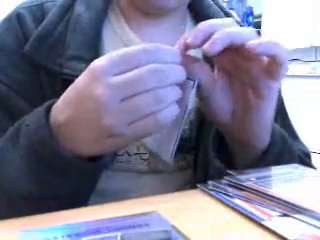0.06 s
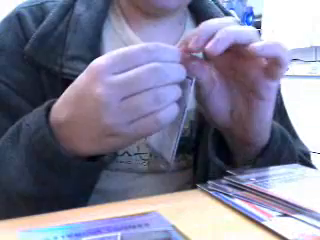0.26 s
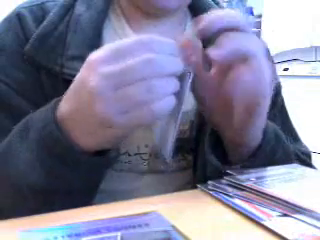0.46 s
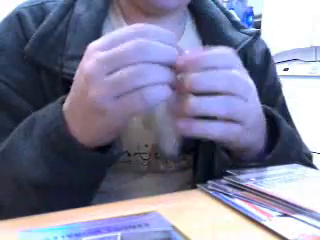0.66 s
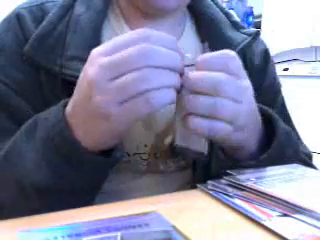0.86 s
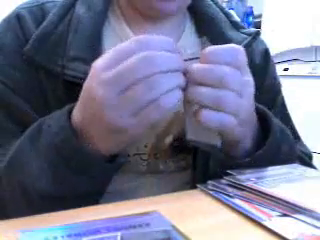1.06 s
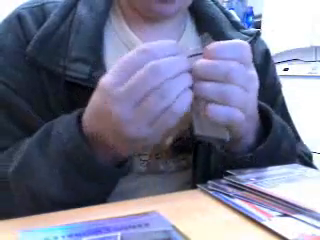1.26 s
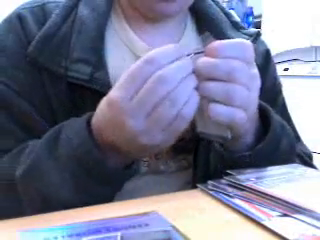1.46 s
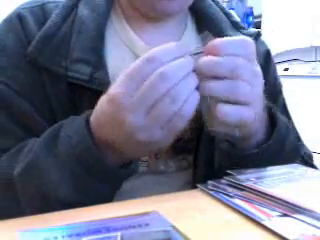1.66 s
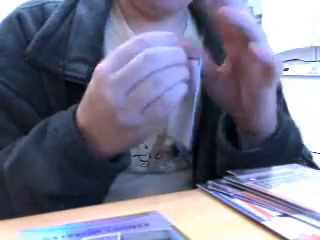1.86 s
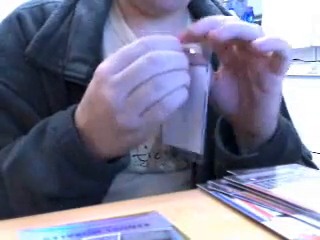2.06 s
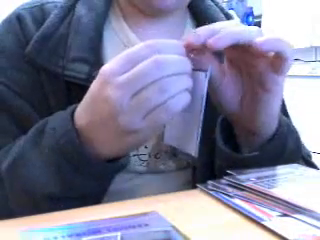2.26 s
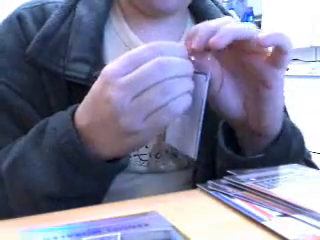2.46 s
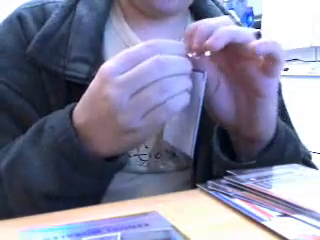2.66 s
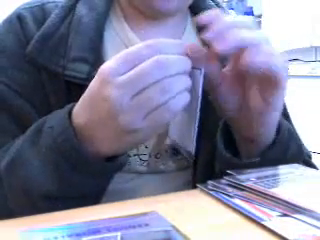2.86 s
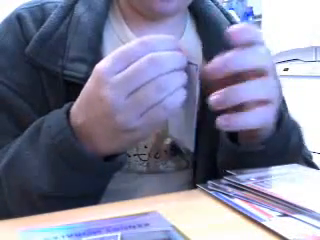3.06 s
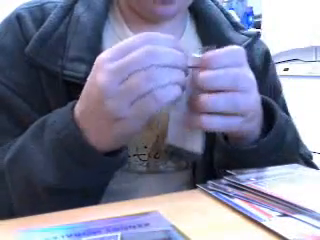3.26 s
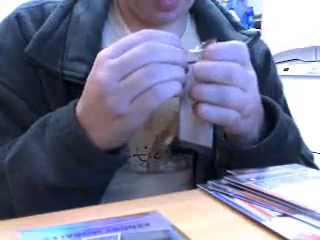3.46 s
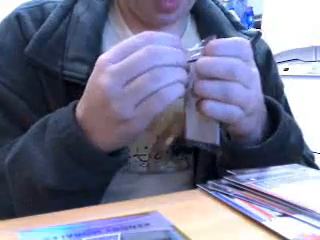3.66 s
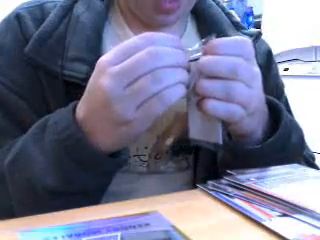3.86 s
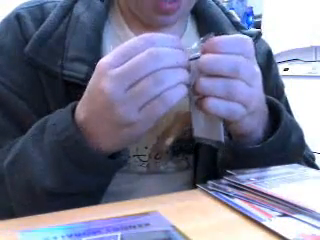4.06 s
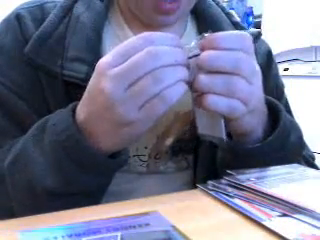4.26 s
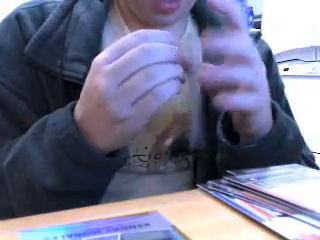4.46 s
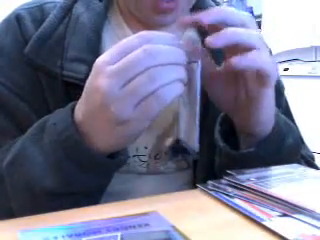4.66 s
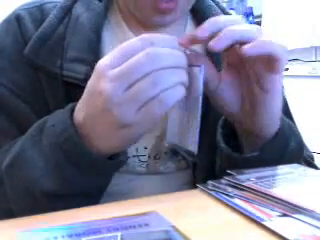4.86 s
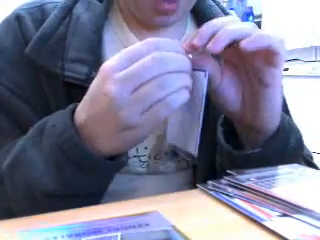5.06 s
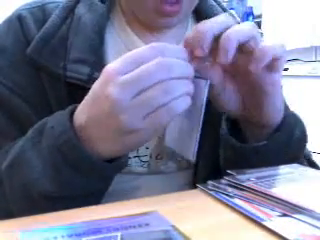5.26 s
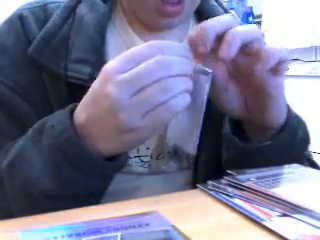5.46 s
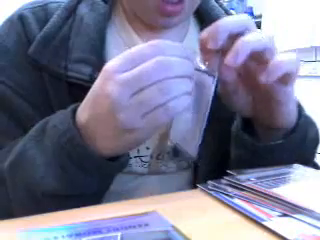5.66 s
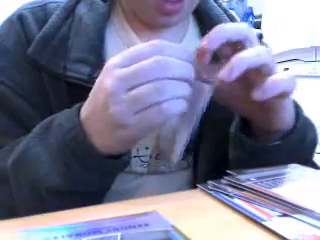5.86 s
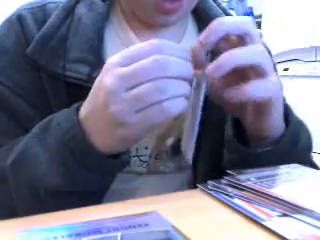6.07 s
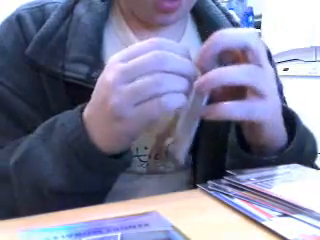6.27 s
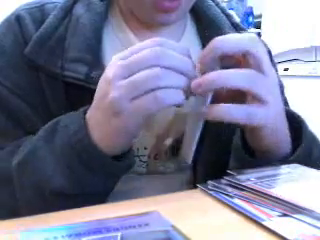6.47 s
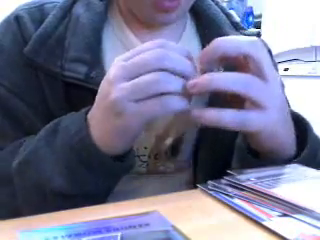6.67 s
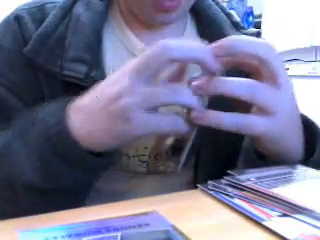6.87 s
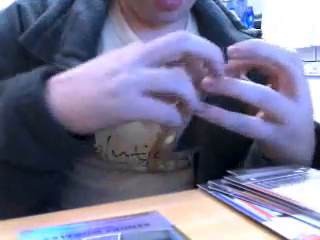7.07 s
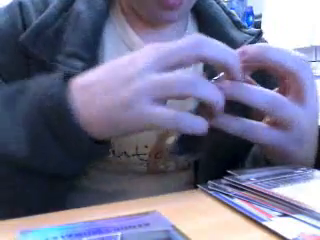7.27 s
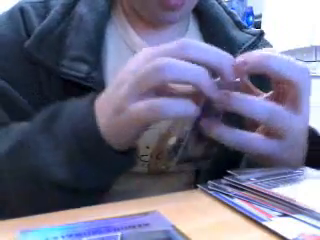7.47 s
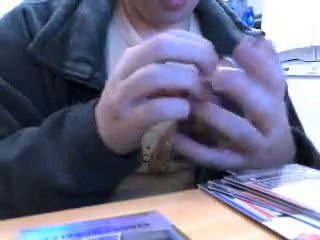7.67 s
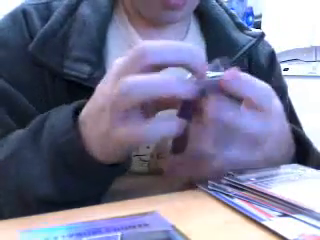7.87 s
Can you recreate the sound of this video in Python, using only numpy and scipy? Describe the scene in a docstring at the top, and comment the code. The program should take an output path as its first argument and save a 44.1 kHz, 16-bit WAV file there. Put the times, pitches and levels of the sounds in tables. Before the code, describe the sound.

Hands crease and tear a stiff plastic wrapper at a table, close to the microphone. Irregular dry snaps, crisp and ringing, with finer crinkle between them, come in waves: strong early, nearly quiet for a while, scattered in the middle, then thick and loud towards the end. Occasional dull finger knocks and soft low thumps join in. Small room, short reflections, faint hum and hiss.

```python
"""Small plastic pack torn by hand

In a quiet room, close to the microphone, fingers tear a small plastic pack. Each crease of the film is a noisy
rattle ringing resonances: sharp snaps, with finer crackle between them. Knocks ring the body of the pack alone,
and decaying sine swings make the low thumps of the moving pack pushing at the microphone. A near wall and
the room answer; mains hum and shaped-noise hiss lie underneath, and the loudest snaps clip."""
import sys
import numpy as np
from scipy import signal
from scipy.fft import rfft, irfft, next_fast_len
from scipy.io import wavfile
from scipy.ndimage import map_coordinates

SR = 44100
rng = np.random.default_rng(int(sys.argv[2]) if len(sys.argv) > 2 else 0)


def transcribe(u):
    """Save the signal u as a 16-bit wav file named by the first command-line argument.

    u: samples, shape (n,) or (channels, n), limited to [-1, 1]; the rate is SR.
    q: integer samples, one column per channel.
    """
    v = np.clip(np.atleast_2d(u).T, -1, 1)
    q = np.round(v * 32767).astype(np.int16)
    wavfile.write(sys.argv[1], SR, q)


N = 349272  # length of the scene in samples


def amp(db):
    """Amplitude factor of a level in dB."""
    return 10 ** (np.asarray(db) / 20)


def unit(x):
    """x scaled to an RMS of 1."""
    return x / np.sqrt(np.mean(x ** 2) + 1e-20)


def along(points, hz):
    """Values at hz, read between (Hz, value) points on a log frequency axis."""
    point_hz, value = np.transpose(points)
    return np.interp(np.log(hz + 1), np.log(point_hz), value)


def wobble(rate):
    """A smooth random curve through rate knots a second."""
    knots = rng.standard_normal(int(N * rate / SR) + 4)
    return map_coordinates(knots, [np.arange(N) * rate / SR])


def filtered(x, response):
    """x passed through a response given as a function of frequency in Hz."""
    size = next_fast_len(N + SR // 2)
    spectrum = rfft(x, size) * response(np.fft.rfftfreq(size, 1 / SR))
    return irfft(spectrum, size)[..., :N]


# Spectrum of the hiss in the empty room. Each row: frequency in Hz, relative density in dB per Hz.
HISS_SPECTRUM = [(25, -5), (50, -5), (107, -8), (200, -12.5), (480, -17), (850, -23.5), (1500, -22.5),
                 (2700, -27), (6000, -29.5), (9000, -33), (12500, -36)]


def floor():
    """Mains hum, drifting slightly in phase and level, over noise shaped into rumble and hiss."""
    t = np.arange(N) / SR
    hum = np.sin(2 * np.pi * 59.7 * t + .4 * wobble(4)) * amp(wobble(8))
    hiss = unit(filtered(rng.standard_normal(N), lambda hz: amp(along(HISS_SPECTRUM, hz))))
    return amp(-47.0) * hum + amp(-50.5) * hiss


def ringing(f, modes):
    """The complex response of a set of resonances, summed with alternating sign."""
    total = 0
    for k, (center, width, db) in enumerate(modes):
        resonance = 1j * f * width / (center * center - f * f + 1j * f * width)
        total = total + (-1) ** k * amp(db) * resonance
    return total


def buckle(times, db, modes, rise, t60, spread):
    """A short rattle of force at each time rings the modes, their pitch shifted at random each time.

    rise and t60 are in seconds, db is the energy of each event, spread the pitch scatter as a log ratio."""
    t = np.arange(-150, 618) / SR
    swell = np.exp(t / rise) + 0.13 * np.exp(t / (4 * rise))  # a faint slower swell leads into the sharp peak
    decay = amp(-60 * t / t60) + 0.39 * amp(-60 * t / (4 * t60))
    shape = np.where(t < 0, swell, decay)
    chance = rng.standard_normal((len(times), len(t) + 1))
    force = chance[:, 1:] * shape
    hz = np.fft.rfftfreq(len(t), 1 / SR) * np.exp(spread * chance[:, :1])
    low_cut = hz / (hz + modes[0][0])  # thins out what lies below the first mode
    rows = irfft(rfft(force) * ringing(hz, modes) * low_cut, len(t))
    rows = rows / np.linalg.norm(rows, axis=1, keepdims=True) * amp(db)[:, None]
    where = np.round((times[:, None] + t) * SR).astype(int)
    return np.bincount(np.clip(where, 0, N).ravel(), rows.ravel(), N + 1)[:N]


# Resonances of the bright edge, the sheet and the pack's body.
# Each row: frequency in Hz, width in Hz, level within its own set in dB.
EDGE_MODES = [(5566, 656, 4.5), (7450, 870, 3.5), (8830, 2180, 4.5), (11200, 3900, -2.5)]
SHEET_MODES = [(2495, 290, -2), (2937, 630, 9), (4380, 2440, -10)]
BODY_MODES = [(520, 570, -5.5), (1160, 310, 2), (1885, 500, 2.5)]
# the duller a crease, the more the body joins: dB against the edge, growth per dB of sheet ring, spread dB
BODY_DB, BODY_GROWS, BODY_SCATTER_DB = -15.5, 0.68, 3


def film(times, db, sheet_db, t60):
    """A buckling crease drives the bright edge, the sheet and the pack's body."""
    body_db = BODY_DB + BODY_GROWS * sheet_db + BODY_SCATTER_DB * rng.standard_normal(len(times))
    edge = buckle(times, db, EDGE_MODES, 0.00029, t60, spread=0.072)
    sheet = buckle(times, db + sheet_db, SHEET_MODES, 0.00042, 0.88 * t60, spread=0.063)
    body = buckle(times, db + body_db, BODY_MODES, 0.00048, 2.84 * t60, spread=0.1)
    return edge + sheet + body


# Single snaps of the film, loud and faint, close to the microphone.
# Each row: time in seconds, energy of the bright edge in dB, sheet ring in dB against the edge.
SINGLE_SNAPS = [(0.0493, -5, -10.5), (0.0607, -10, -23), (0.0956, -8.0, -17), (0.1021, -3.5, -13),
                (0.1395, -7.5, -0.5), (0.2294, -7.5, -13), (0.3269, -7.5, -21), (0.3718, -3, -9.5),
                (0.4583, -2.5, -8), (0.5622, -0.5, -4.5), (0.5663, -9, -1), (0.6173, -9.5, -21),
                (0.6265, -13, -10), (0.7369, 1, -13.5), (0.746, 4, -16), (0.7528, -6, -6),
                (0.7575, -1, -16), (0.7772, 0, -11), (0.7834, 4, -16), (0.793, 5.5, -22), (0.7975, 0, -9),
                (0.8105, 2, -8), (0.8177, 1.5, -13), (0.843, -2, -11), (0.8476, 9.0, -10.5),
                (0.854, 2.5, -7), (0.9015, -6, 2), (0.9093, -8, 7.5), (0.9244, 9.5, -23), (0.9288, -5, 8),
                (0.9348, 5.5, -9), (0.9589, -5.0, 5.5), (0.9727, 9.5, -9), (0.9774, 10.5, -15),
                (0.9823, -8, 11), (1.0047, -7, 4), (1.0115, 3.5, 0), (1.0233, 8.5, -5), (1.041, -1.5, -2.5),
                (1.0712, 1.5, -8), (1.123, 0, -10), (1.128, 3.5, -9), (1.1777, 2, 2.5), (1.2062, 0, -2.5),
                (1.2519, -2, 5.5), (1.2886, -14, -9), (1.3061, 9.5, -6), (1.3275, 4.5, 5.5), (1.342, 3, -7),
                (1.3759, 8.5, -8), (1.4304, 11.5, -1.5), (1.441, 11.5, -1.5), (1.5284, -18, 4.5),
                (1.5559, -2, -7), (1.6233, 7.5, -3.5), (1.6717, -10.5, -6), (1.731, -3, -1),
                (1.736, 14.5, -6.5), (1.7442, 6, -11), (1.7491, 2.5, -6), (1.768, 6.5, -5),
                (1.7874, 12.5, -2), (1.8362, 0, 1), (1.8384, 10, -9), (1.85, 1.0, -22), (1.8645, 13, -10.5),
                (1.8888, 0.5, -13), (1.9017, -5.5, 3), (1.9402, -10, -5), (1.9912, -10.0, -2),
                (2.0253, 5.5, -4), (2.045, 10, -4), (2.084, -10, -7), (2.0997, -4.5, -6), (2.1158, -8, -1),
                (2.2166, -10.5, -19), (2.2586, -21.5, 7), (2.2936, -13.5, -11), (2.3071, -15.5, 3.5),
                (2.3231, -6.5, -3), (2.4437, -5.5, -5.5), (2.4518, -7.5, -25), (2.473, -8.5, -13),
                (2.4794, -6, -8.5), (2.5623, -11, -21), (2.5787, -6.5, -9), (2.687, -0.5, -15),
                (2.7046, -3, -10), (2.729, -14, -5), (2.8262, -8, -7.5), (2.8483, -12, -11),
                (2.8981, -7, -11), (2.9137, -11.5, -9), (2.936, -5.0, -5.5), (3.08, -24, -3),
                (3.117, -6, -12.5), (3.1456, -11.5, -18), (3.1844, -17.5, -2), (3.2009, -19.5, 2),
                (3.2511, -10, -7), (3.2657, -8, 3.5), (3.2886, -10.5, -1), (3.2989, -2, 0),
                (3.307, -8.5, 2), (3.3116, -4, -4), (3.3326, 3, -4.5), (3.3533, -1, -4),
                (3.3766, 5.5, -4.5), (3.3846, 2.5, 0), (3.3897, 0, -4), (3.4121, -10, -3),
                (3.4343, 8.0, -12), (3.4472, -6, -5), (3.4498, 5.5, -13), (3.469, -6.5, -6),
                (3.524, -12, -5), (3.533, -9.5, 4.5), (3.5407, -20.5, 12), (3.5823, 2.5, -19),
                (3.5985, -3.5, 3), (3.614, -3.5, -6.5), (3.6959, -34, 22), (3.73, -14, -10),
                (3.7429, 6.0, -4), (3.7735, 4, -0.5), (3.7773, 0.5, -10), (3.7842, -6.0, 3),
                (3.7953, -8, -13), (4.0119, -12.0, -7), (4.1806, 4, 0.5), (4.272, -21, 10.5),
                (4.3886, 1.5, -5.5), (4.4457, -2.5, 1.5), (4.4567, 0, -3), (4.469, -11, 0),
                (4.4719, -5, 2.5), (4.5302, -7, -5), (4.5425, -2.5, -10), (4.5563, -1, -6),
                (4.6199, -0.5, -7), (4.6382, 0, -10), (4.6435, 4, -11), (4.7005, -18.5, -5),
                (4.7965, 2.5, -8.5), (4.829, -11, 1), (4.848, -12.5, 0), (4.8855, 3.5, -5.5),
                (4.9066, -3.0, 0), (4.9504, -14, 1.5), (4.9806, 2.5, 0), (5.0433, -5, -2.5),
                (5.055, -3, -28), (5.1231, -5, -4), (5.182, -8, -10), (5.2364, 1.5, -33),
                (5.249, -3.5, -3.5), (5.2872, -9, -15), (5.2978, -12, -20), (5.3227, 5, -18),
                (5.386, 2.5, -3), (5.4228, -11, -7), (5.443, -7.5, -1.5), (5.4749, 1, -5), (5.4839, 2, -20),
                (5.4883, -3, 1), (5.4953, 13, -15), (5.504, -1, 4), (5.5082, 9.5, -12), (5.5212, 5.5, -4),
                (5.5343, 6.5, -4), (5.5424, 10, -17), (5.5521, 0.0, -9), (5.5737, 8, -15),
                (5.5782, 5.5, -8.5), (5.585, 1, -5), (5.6016, 1, -8), (5.6224, 8, -16), (5.6261, 14, -15.5),
                (5.6497, -1.5, -5), (5.685, -4, 2), (5.701, 7.5, -15), (5.7663, -13, -13), (5.8407, -22, 2),
                (5.9044, -0.5, -6.5), (5.9195, 1, -11), (5.9239, 10, -5.5), (5.933, -3, -11),
                (5.9541, 2.5, -9), (5.9922, -8, -11), (6.0232, -10, -6), (6.0344, -11, -3),
                (6.1287, -6, -7), (6.1966, 2, -6), (6.2238, -17, 14), (6.2375, 6, 3.5), (6.267, -4.5, -7),
                (6.28, -12, 9), (6.3093, 5.5, -10), (6.3267, -4.5, -3), (6.3368, -4, 3.5),
                (6.3579, -4, -6.5), (6.4023, 9, -9), (6.4828, -0.5, -9.5), (6.5145, -1.5, -13),
                (6.5192, -3, 0.5), (6.5294, -4, -2), (6.5868, -2, -1), (6.5969, -10.5, -5),
                (6.631, -15.5, -8), (6.6927, -11.5, -10), (6.7342, 5.5, -10), (6.7428, 8.5, -13),
                (6.7757, 2, 1.5), (6.781, -2, -18), (6.7836, 7, 7.5), (6.809, -8.0, 10), (6.8171, -0.5, -8),
                (6.8538, -1, -10), (6.8683, -1, 1.5), (6.8924, 1.5, -3), (6.9191, 0.5, -12),
                (6.9267, 7, -10), (6.9987, 2, -4), (7.0073, 5.5, -6), (7.0299, 2.5, 5.5),
                (7.0349, 3.5, -10), (7.0409, 7.5, -8), (7.0455, 2.5, -4), (7.0528, 3, 1.5),
                (7.0717, 3.5, -10), (7.0853, 3.5, -4), (7.0916, 8.5, -3.5), (7.0967, 5.5, -9),
                (7.1165, -3.0, -4), (7.1208, 3, -5), (7.126, -3, -3), (7.1662, 3.5, -5), (7.1747, 1, -11),
                (7.1817, 13, -7.5), (7.1985, 6.5, -9), (7.2013, 5, -9), (7.2232, 8, -8),
                (7.226, 12.5, -9.5), (7.2303, -0.5, 5), (7.2687, -5.5, 3), (7.3021, -6, -4),
                (7.3088, 0, 1.5), (7.3481, -1.0, -7), (7.3595, -5, -14), (7.4733, -7.0, 0.5),
                (7.5295, 5, -5.5), (7.546, 9, -9.5), (7.5499, 2.5, 0.5), (7.5596, -2, -13),
                (7.5687, 0.5, -2), (7.5937, -1, -3), (7.6034, 10.5, -16), (7.6169, 9, -8.5),
                (7.621, 0.5, -2), (7.6232, 1, -9), (7.6807, -1.5, -18), (7.6935, -13, -13),
                (7.7336, -2.5, -2), (7.7683, -11.5, 1), (7.795, -0.5, -7), (7.8032, 2, -3)]


def snaps():
    """The single creases that can be told apart, each buckling once."""
    return film(*np.transpose(SINGLE_SNAPS), t60=0.0034)


# Stretches where fingers slide over the film.
# Each row: start in seconds, length in seconds, usual crease energy in dB.
SLIDING_STRETCHES = [(0.258, 0.13, -31.5), (0.546, 0.062, -32), (0.688, 0.057, -29), (0.797, 0.05, -19),
                     (0.88, 0.16, -21.5), (1.466, 0.058, -29), (1.752, 0.021, -19), (2, 0.06, -22.5),
                     (2.125, 0.14, -34.0), (2.498, 0.1, -37), (2.683, 0.042, -30), (4.425, 0.086, -27.5),
                     (5.853, 0.061, -32), (6.03, 0.084, -30), (6.201, 0.059, -24.5), (6.405, 0.07, -30),
                     (6.661, 0.053, -38.0), (6.793, 0.09, -18.5), (6.965, 0.17, -21.5), (7.376, 0.087, -33),
                     (7.551, 0.063, -15), (7.702, 0.07, -26), (7.89, 0.04, -29.5)]
SLIDING_FADE_DB_PER_S = 508  # on either side of a stretch
# fine crackle: level under the snaps around it, its build-up before a snap and fade after one
RUSTLE_DB, RISE_DB_PER_S, SETTLE_DB_PER_S = -27, 350, 273


def crackle(count=6000):
    """Fine creases at random moments, strong under sliding fingers and where strong snaps stand close on both sides."""
    chance = rng.random((count, 3))
    s = chance[:, 0] * N / SR
    snap_s, snap_db, _ = np.transpose(SINGLE_SNAPS)
    since = s[:, None] - snap_s
    past_db = np.where(since > 0, snap_db - SETTLE_DB_PER_S * since, -45).max(axis=1)
    coming_db = np.where(since < 0, snap_db + RISE_DB_PER_S * since, -45).max(axis=1)
    between_db = (past_db + coming_db) / 2 + RUSTLE_DB

    start, length, usual_db = np.transpose(SLIDING_STRETCHES)
    outside = np.maximum(np.abs(s[:, None] - start - length / 2) - length / 2, 0)  # seconds from the stretch
    sliding_db = np.max(usual_db - SLIDING_FADE_DB_PER_S * outside, axis=1)

    clump_db = 3 * wobble(25)[(s * SR).astype(int)]
    size_db = -4.5 * (np.log(1 - .98 * chance[:, 1]) + 1)  # many small creases, few large
    db = np.maximum(between_db, sliding_db) + clump_db + size_db
    sheet_db = -11 + 14 * chance[:, 2]
    return film(s, db, sheet_db, t60=0.0034)


# Decay of the room around the pack. Each row: frequency in Hz, time to fall by 60 dB in seconds.
ROOM_DECAY = [(500, 0.61), (3000, 0.11), (7000, 0.16), (12000, 0.047)]
# the near wall's echo: delay s, level dB; level of the room's tail dB
WALL_S, WALL_DB, ROOM_DB = 0.013, -23, -16


def room(x):
    """A near wall, then a noise tail with its own decay in each band, drawn anew 16 times a second."""
    out = np.zeros(N + SR)
    out[round(WALL_S * SR):][:N] += amp(WALL_DB) * x
    hop = SR // 16
    for start in range(0, N, hop):
        hz, t, noise = signal.stft(rng.standard_normal(SR // 4), SR, nperseg=128)
        decay = amp(-60 * t / along(ROOM_DECAY, hz)[:, None])
        tail = signal.istft(noise * decay, SR, nperseg=128)[1]
        wet = signal.fftconvolve(x[start:start + hop], tail / np.linalg.norm(tail))
        out[start + 150:][:len(wet)] += amp(ROOM_DB) * wet  # the tail sets in 150 samples late
    return out[:N]


# Fingers knocking the pack's body. Each row: time in seconds, energy in dB.
FINGER_KNOCKS = [(1.0705, -9), (1.1777, -8), (1.8637, -10.5), (3.7732, -1.5), (4.628, -13), (5.5786, -7),
                 (6.1968, -20), (6.7427, -7), (6.8929, -7), (7.2244, -14)]


def knocks():
    """A dull knock rings the body alone."""
    return buckle(*np.transpose(FINGER_KNOCKS), BODY_MODES, 0.0008, 0.013, spread=0.032)


# Low thumps of the moving pack at the microphone.
# Each row: start in seconds, peak of the push in dB, pitch in Hz, knock as a share of the push from 0 to 1.
LOW_THUMPS = [(1.181, -37, 80, 0.02), (1.263, -24.5, 86, 0.17), (1.362, -18.5, 91, 0.64),
              (1.447, -30, 88.5, 0.16), (6.891, -36.5, 89, 1), (7.015, -27, 59.6, 0.13),
              (7.078, -21.5, 102, 1), (7.101, -27.5, 61, 0.3), (7.118, -29.5, 36, 0.2),
              (7.232, -36, 55.3, 0.2), (7.46, -38, 50.3, 0.1), (7.745, -33.5, 69.45, 0.48),
              (7.836, -30, 55.7, 0.1)]


def thumps():
    """One slow push and its rebound, a fast-dying sine, with a short 300 Hz knock on top."""
    out, t = np.zeros(N + SR), np.arange(SR // 10) / SR
    for s, db, hz, share in LOW_THUMPS:
        cycles = t * hz
        push = -np.sin(2 * np.pi * cycles) * cycles ** 1.1 * np.exp(-3.2 * cycles)
        knock = share * np.sin(2 * np.pi * 300 * t) * amp(-60 * t / 0.033)
        out[round(s * SR):][:len(t)] += amp(db) * (push / np.abs(push).max() + knock)
    return out[:N]


def scene():
    """The pack in the room, with the thumps at the microphone, over the floor noise."""
    pack = snaps() + knocks() + crackle()
    return (pack + room(pack) + thumps() + floor())[None]


TOP_HZ = 12360  # middle of the 300 Hz wide slope at the band limit


def record(dry):
    """The input clips at full scale; nothing is kept above the slope at the band limit."""
    clipped = np.clip(dry, -1, 1)
    limited = filtered(clipped, lambda hz: np.clip((TOP_HZ - hz) / 300 + .5, 0, 1) ** 2)
    return np.clip(limited, -1, 1)


dry = scene()
out = record(dry)
transcribe(out)
```